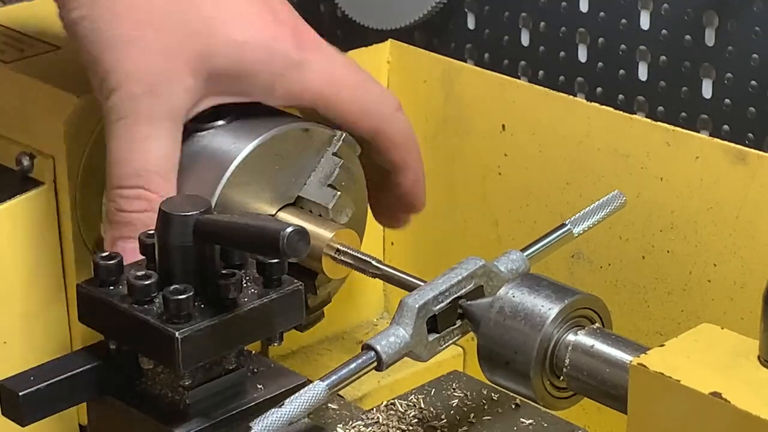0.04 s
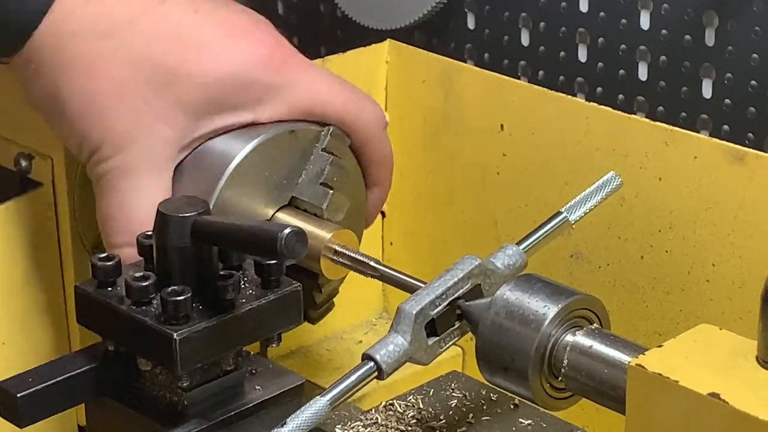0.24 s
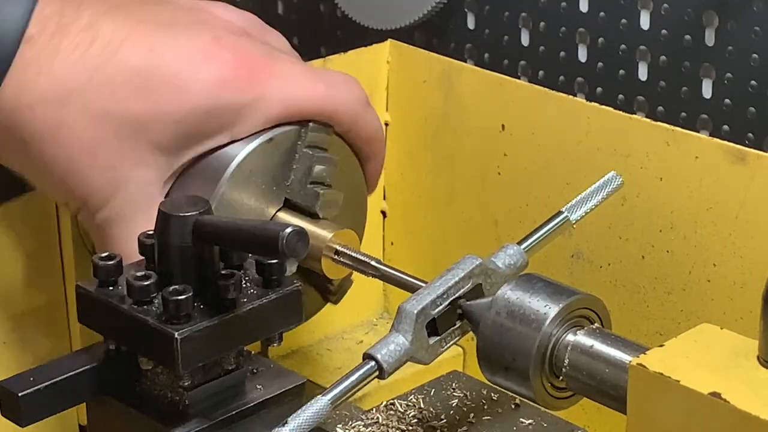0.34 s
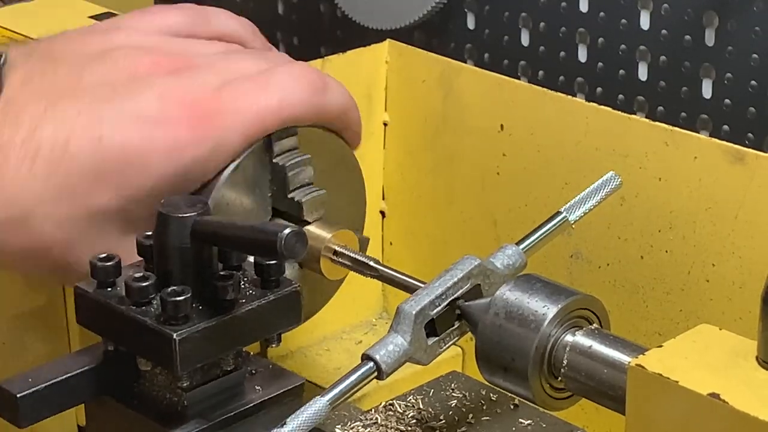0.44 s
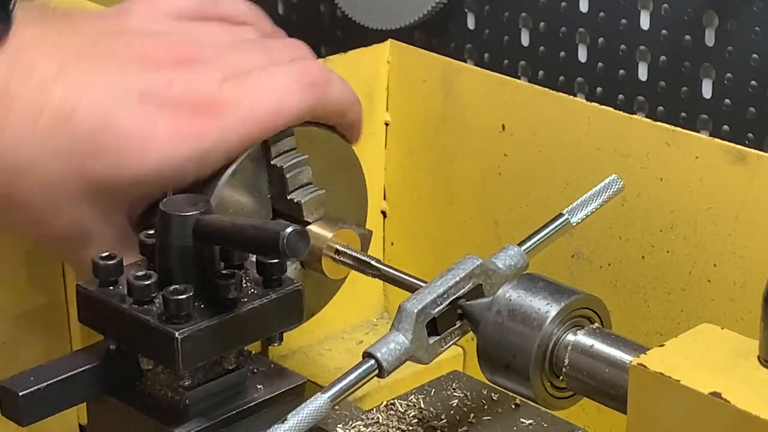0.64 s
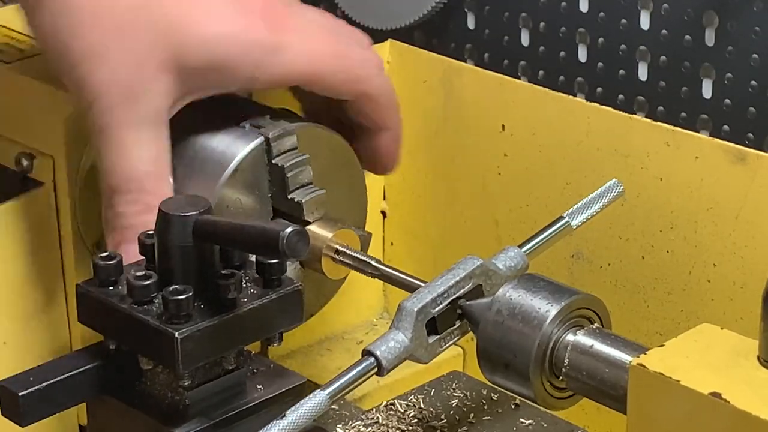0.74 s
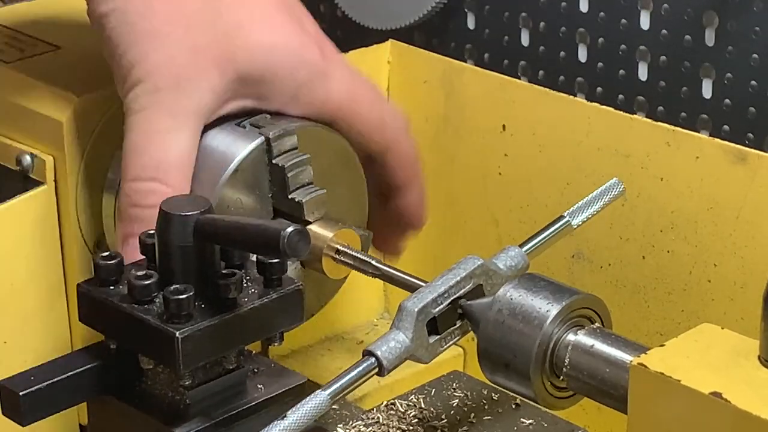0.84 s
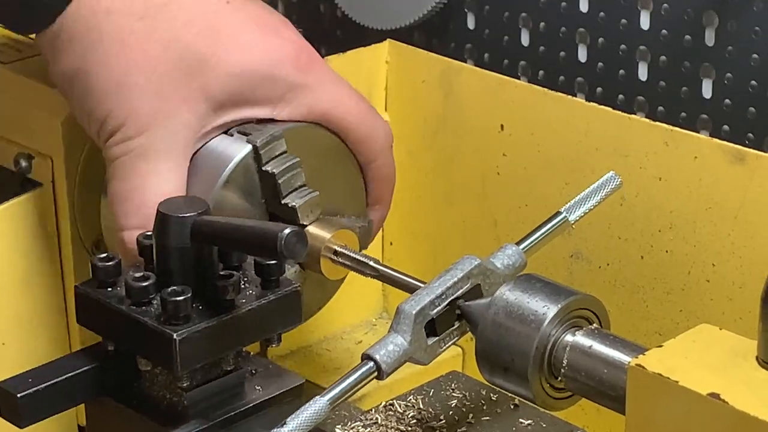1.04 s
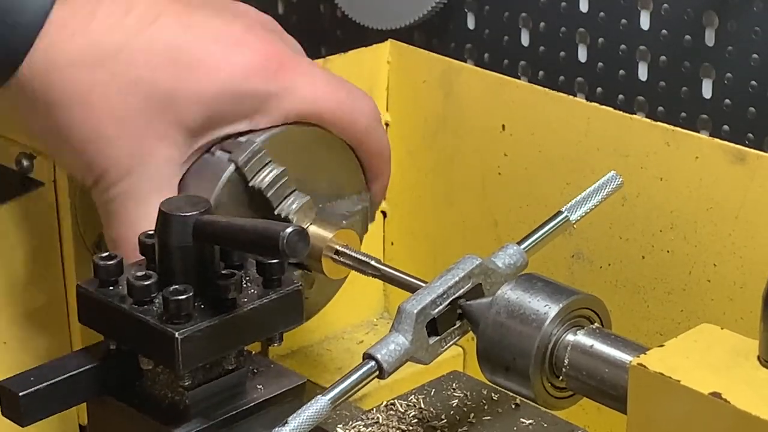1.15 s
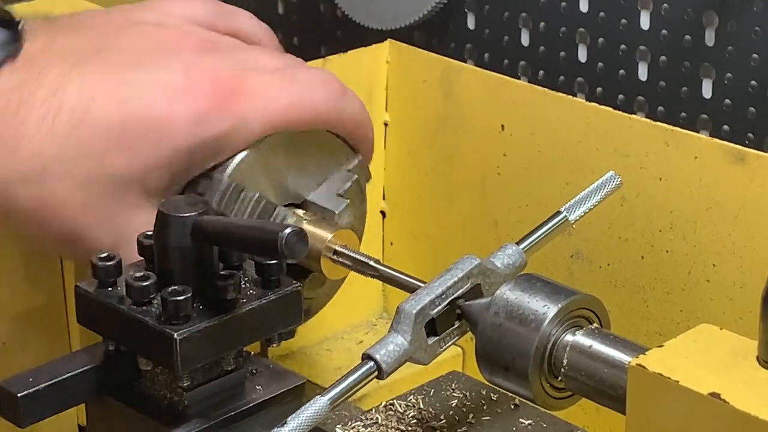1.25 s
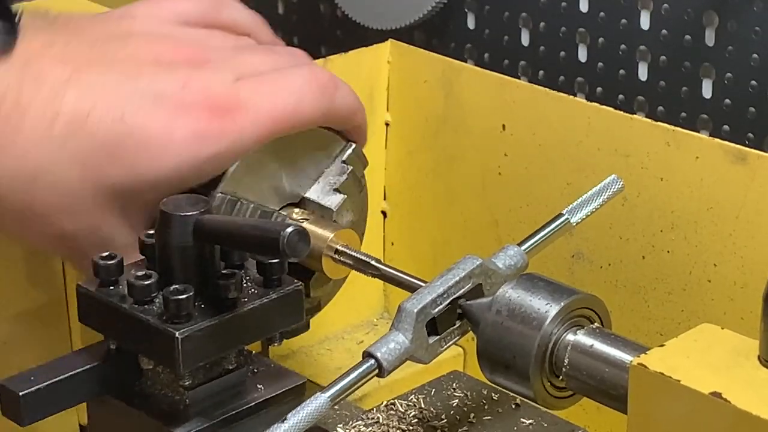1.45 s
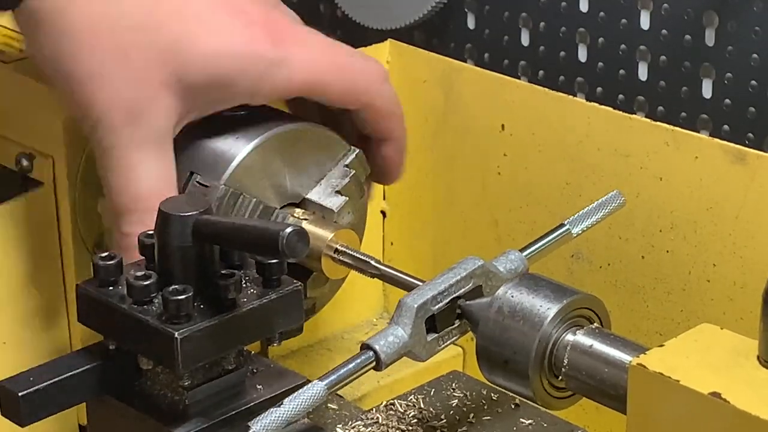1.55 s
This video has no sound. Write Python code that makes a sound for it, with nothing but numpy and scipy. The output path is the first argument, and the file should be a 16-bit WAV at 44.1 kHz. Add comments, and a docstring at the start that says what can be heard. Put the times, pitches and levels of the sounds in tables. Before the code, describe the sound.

Lathe gears, turned by hand, click a few times from about 0.15 seconds, then rattle and whine with a high metallic ring from 0.25 to 0.5. Light clicks follow, and a sharp one at 1 second starts a second whir that rises, holds and drops away by 1.35. A faint rumble surrounds each push. The sound is close, in a small, echoing workshop with a soft hush.

```python
"""In a small, echoing workshop, a hand turns a lathe's chuck in two short pushes to cut a thread.
Each push takes up the slack in the gears with a few clicks, then spins them: the teeth rattle, ring
high and whine at the rate they meet, inside a sheet-metal housing. The spindle rumbles when it rolls
slowly, and the bench shakes faintly. A close stereo microphone hears it all over soft room noise."""
import sys
import numpy as np
from scipy import signal
from scipy.fft import rfft, irfft
from scipy.io import wavfile
from scipy.ndimage import uniform_filter1d

SR = 44100
rng = np.random.default_rng(int(sys.argv[2]) if len(sys.argv) > 2 else 0)


def master_out(mix):
    """Clip the mix to full scale and print it as 16-bit PCM to the path in sys.argv[1]."""
    frames = np.transpose(np.atleast_2d(mix))
    ceiling = np.clip(frames, -1, 1)
    pcm = np.round(ceiling * 32767).astype(np.int16)
    wavfile.write(sys.argv[1], SR, pcm)


N = 70560
TIME = np.arange(N) / SR
FREQS = np.arange(N + 1) * SR / (2 * N) + 1e-6  # Hz, for filtering; never exactly zero
LEFT_RIGHT = np.array([[1], [-1]])

# long-ringing notes of the sheet-metal panels: f/Hz, width/Hz, relative level/dB
PANEL_MODES = [(1030, 11, 7), (2120, 14, -9), (3060, 16, -18)]


def two_pushes():
    """The hand spins the gears twice; the four signals of each push are added up."""
    # how many teeth meet each second: t/s, f/Hz
    first_speed = [(.237, 481.5), (.262, 798.4), (.283, 947.4), (.305, 971.9), (.33, 934.7), (.357, 1031),
                   (.379, 1035), (.394, 924.8), (.412, 906.2), (.432, 821.4), (.45, 1030), (.471, 994.7),
                   (.487, 756.8), (.51, 377.8)]
    second_speed = [(1.009, 340), (1.06, 540), (1.10, 760), (1.125, 935), (1.143, 1020), (1.18, 1036),
                    (1.25, 1033), (1.292, 1014), (1.304, 890), (1.317, 640), (1.332, 380)]
    # strength of the push: t/s, gear taps/dB, housing taps/dB, whine drive/dB
    first_strength = [(0.236, -23.5, -35, -28), (0.276, -29, -31.5, -40.5), (0.285, -20.5, -35.5, -25.5),
                      (.31, -28, -43.5, -20), (0.316, -20.5, -33, -24.5), (.348, -24.5, -38.5, -23),
                      (0.372, -17.5, -40.5, -22.5), (0.399, -27.5, -52.5, -20.5), (0.433, -27, -32, -26),
                      (.462, -26, -36, -23.5), (.508, -30.5, -34.5, -26.5)]
    second_strength = [(1.011, -31, -39.5, -34), (1.029, -29.5, -34.5, -45.5), (1.11, -26.5, -32.5, -26.5),
                       (1.149, -21, -41, -23.5), (1.19, -22.5, -35.5, -26), (1.205, -23, -68.5, -21.5),
                       (1.24, -23.5, -45, -21), (1.265, -21, -56, -23.5), (1.292, -24, -34.5, -33.5),
                       (1.331, -34, -36, -27.5)]
    return push(first_speed, first_strength) + push(second_speed, second_strength)


def push(speed, strength):
    """One push gives taps on the gears, taps on the housing, a whine and taps for a low growl."""
    full_speed_hz, wobble = 1038, .005
    speed, strength = np.array(speed), np.array(strength)
    tooth_hz = np.interp(TIME, *speed.T) * (1 + wobble * wander(90))
    tooth_count = np.cumsum(tooth_hz) / SR
    pace = tooth_hz / full_speed_hz
    gear_gain, housing_gain, drive = (undb(np.interp(TIME, strength[:, 0], db)) for db in strength.T[1:])
    whine = drive * gear_whine(tooth_count, tooth_hz) * pace ** 2.9  # grows with speed
    growl_taps = undb(-41 - 15.5 * pace ** 6) * tooth_taps(tooth_count, tooth_hz)  # fades with speed
    gear_taps = gear_gain * tooth_taps(tooth_count, tooth_hz)
    housing_taps = housing_gain * tooth_taps(tooth_count, tooth_hz)
    return gate(speed[0, 0], speed[-1, 0]) * np.array([gear_taps, housing_taps, whine, growl_taps])


def tooth_taps(tooth_count, tooth_hz):
    """Each tooth lands with one uneven tap and a short scrape after it."""
    jitter_teeth, scatter_db, scrape_s = .13, 2.5, .0001
    uneven_count = np.maximum.accumulate(tooth_count + jitter_teeth * wander(900))
    taps = np.diff(np.floor(uneven_count), prepend=0)
    taps *= undb(scatter_db * rng.standard_normal(N).clip(-2, 2)) / np.sqrt(tooth_hz)
    tails = signal.lfilter([1], [1, -np.exp(-1 / (scrape_s * SR))], taps)
    scrape = tails * rng.standard_normal(N)
    return unit(unit(taps - taps.mean()) + undb(-12.5) * unit(scrape))


def gear_whine(tooth_count, tooth_hz):
    """Meeting teeth make a tone whose overtones swell as they pass a resonance."""
    # resonances that pick out the overtones: f/Hz, width/Hz, gain/dB
    modes = [(1110, 59.6, -1.5), (1854, 57.3, 2), (3360, 460, -13.5), (3970, 240, -19), (5230, 360, -9.5),
             (7560, 380, -14), (10020, 370, -15), (10660, 200, -1.5), (11370, 110, -17)]
    phase = tooth_count + .022 * wander(350)  # each tooth meets a little early or late
    whine, flutter_db = 0, 2.5
    for k in range(1, 12):
        gain = np.sqrt(sum(abs(response([mode], k * tooth_hz)) ** 2 for mode in modes))
        whine += gain * undb(flutter_db * wander(71)) * np.sin(2 * np.pi * k * phase)
    return whine


def gear_ring(taps, rubbing):
    """Tooth taps and a little rubbing make the steel gears ring high."""
    # notes of the gears: f/Hz, width/Hz, relative level/dB
    modes = [(8070, 67, -7.5), (9180, 47, -0.5), (9830, 200, -4.5), (10160, 48, 1), (10360, 70, 5.5),
             (10950, 30, -6.5), (10920, 69, -2.5), (11080, 780, -13), (11340, 94, -3.5),
             (11600, 240, -12.5), (12400, 1000, -9.5), (12800, 100, -1), (13470, 190, -2.5),
             (14600, 660, -11), (15550, 270, -8.5)]
    return ring(taps + undb(-14) * rubbing, modes, low_hz=6500)


def housing_rattle(taps, click_force):
    """Tooth taps rattle the housing; taps and clicks leave its panels ringing."""
    # notes of the housing: f/Hz, width/Hz, relative level/dB
    modes = [(806, 40, -6.5), (1054, 157, 2), (1940, 504, -2.5), (2060, 38, -3), (2176, 200, -2),
             (2745, 250, 0), (3140, 180, 4), (3350, 340, -2), (3947, 220, -7), (5123, 530, -9),
             (6390, 210, 0.5), (7264, 120, -3.5)]
    panels = undb(-14) * ring(taps + click_force, PANEL_MODES, low_hz=700)
    return ring(taps, modes, low_hz=243.6) + panels


def gear_growl(taps):
    """The teeth of slowly turning gears stir up low notes."""
    # notes of the growl: f/Hz, width/Hz, relative level/dB
    modes = [(340, 55, 3), (464, 93, -4), (570, 45, -3), (795, 90, 2.5)]
    return ring(taps, modes, low_hz=248)


def slack_clicks():
    """Teeth hit as the slack closes: bright snaps, clacks with dull knocks, a force on the housing."""
    # the clicks: t/s, knock f/Hz, knock level/dB, clack level/dB, snap level/dB, burst decay/s
    clicks = [(0.141, 587, -34, -41, -51.5, 0.0081), (.174, 882, -37, -33, -27, 0.0048),
              (0.2348, 1874, -34, -31.5, -18.5, 0.0018), (.601, 1050, -63.5, -62, -36.5, .002),
              (0.781, 1022, -50.5, -49.5, -87, 0.0015), (0.852, 1108, -46.5, -35, -64, 0.0027),
              (0.908, 841, -37, -44.5, -40, 0.011), (1.008, 910, -60, -30, -17.5, 0.0017),
              (1.3255, 565, -35, -50, -39, 0.00033)]
    # brief high and lower notes of teeth pressed together: f/Hz, width/Hz, relative level/dB
    snap_modes = [(9580, 300, 2.5), (12000, 1900, -8.5), (15500, 550, -1.5)]
    clack_modes = [(1060, 300, -12.5), (1960, 380, -2), (3260, 100, -1), (4300, 670, -18),
                   (6500, 1500, -17)]
    knock_drift_hz, knock_rise_s, knock_decay_s, clack_top_hz = 49, .002, .013, 9000
    gear_force, housing_force, knocks = np.zeros((3, N))
    for start, hz, knock_db, clack_db, snap_db, decay_s in clicks:
        started, age = TIME >= start, np.maximum(TIME - start, 0)
        burst = started * np.exp(-age / decay_s) * rng.choice([-1, 1], N)
        gear_force += undb(snap_db) * burst
        housing_force += undb(clack_db) * burst
        cycles = np.cumsum(started * (hz + knock_drift_hz * wander(300))) / SR
        envelope = np.exp(-age / knock_decay_s) * (1 - np.exp(-age / knock_rise_s))
        knocks += undb(knock_db) * envelope * np.sin(2 * np.pi * cycles)
    treble_cut = 1 / (1 + 1j * FREQS / clack_top_hz - (FREQS / clack_top_hz) ** 2)
    housing_force = filtered(housing_force, treble_cut)
    snaps = ring(gear_force, snap_modes, low_hz=7200)
    clacks = ring(housing_force, clack_modes, low_hz=500)
    return snaps, clacks + knocks, housing_force


def spindle_roll():
    """The slowly rolling spindle rubs unevenly; gives the rubbing and the rumble it makes."""
    # slow stretches: start/s, end/s, level/dB
    rolls = [(0.158, 0.253, -45), (0.51, 0.574, -53), (0.891, 1.022, -57), (1.034, 1.124, -45),
             (1.32, 1.452, -54.5)]
    # notes of the rumble: f/Hz, width/Hz, relative level/dB
    modes = [(374, 91, 30.5), (571, 110, -9), (842, 130, -4.5), (1886, 3600, -15.5)]
    envelope = sum(gate(start, end) * undb(db) for start, end, db in rolls)
    rubbing = envelope * rng.standard_normal(N) * undb(wander(180))
    return rubbing, ring(rubbing, modes, low_hz=207)


def bench_shake(rubbing):
    """The spindle's rubbing faintly shakes the bench."""
    # deep notes of the bench: f/Hz, width/Hz, relative level/dB
    modes = [(62, 29.7, 3.5), (112, 40, 3), (190, 38, 5)]
    return undb(-16) * ring(rubbing, modes, low_hz=35)


def workshop(x, guard_db, room_db):
    """Sound reaches the microphone directly, off the lathe's splash guard and as the room's echo."""
    # how far the left channel leads the right: f/Hz, phase/rad
    left_lead = [(0, 0), (4350, -.4), (5400, -3.1), (6300, -6.3), (8450, -9.4), (11100, -12.6),
                 (13500, -15.7), (15450, -18.8), (22050, -27)]
    # time the echo takes to fade by 60 dB: f/Hz, t/s
    echo_times = [(200, 0.31), (550, 0.73), (1400, 0.57), (3700, 0.52), (10000, 0.34), (14000, 0.25)]
    guard_decay_s = .0047
    guard = unit(rng.standard_normal((2, N)) * np.exp(-TIME / guard_decay_s) * (TIME > .001))
    band_hz, fade_times = np.array(echo_times).T
    noise, echo = rng.standard_normal((2, N)), 0
    for share, fade_s in zip(np.eye(len(band_hz)), fade_times):
        band = filtered(noise, np.interp(np.log(FREQS), np.log(band_hz), share))
        echo += band * undb(-60 * TIME / fade_s)
    reflections = (undb(guard_db) * guard + undb(room_db) * unit(echo * (TIME > .006))) / np.sqrt(N)
    mid, side = rfft(reflections, 2 * N)
    spread = FREQS / np.hypot(FREQS, 600)  # low notes are alike on both sides
    reflected = (mid + LEFT_RIGHT * spread * side) / np.sqrt(2)
    direct = np.exp(LEFT_RIGHT * 1j * np.interp(FREQS, *np.array(left_lead).T) / 2)
    power = 1 + undb(guard_db) ** 2 + undb(room_db) ** 2
    return filtered(x, (direct + reflected) / np.sqrt(power))


def room_air():
    """The room has a faint, steady hush."""
    # tone of the hush: f/Hz, relative level/dB
    spectrum = [(20, -19.5), (45, -1), (75, 0.5), (160, -8), (350, -3.5), (600, -11), (1000, -13),
                (2500, -17.5), (5000, -30), (10000, -36), (16000, -43)]
    hz, db = np.array(spectrum).T
    gain = undb(np.interp(np.log(FREQS), np.log(hz), db))
    mid, side = unit(filtered(rng.standard_normal((2, N)), gain))
    return undb(-66) * (mid + undb(-7) * side * LEFT_RIGHT)


def undb(db):
    """Turn decibels into a gain."""
    return 10 ** (np.asarray(db) / 20)


def unit(x):
    """Scale to an average power of 1."""
    return x / np.sqrt(np.mean(x ** 2))


def filtered(x, gain):
    """Apply one gain for each frequency in FREQS."""
    return irfft(rfft(x, 2 * N) * gain)[..., :N]


def response(modes, hz):
    """How modes (an object's own notes) respond at hz, added with alternating signs."""
    return sum((-1) ** k * undb(db) / (1 + 1j * (hz / centre - centre / hz) * centre / width)
               for k, (centre, width, db) in enumerate(modes))


def ring(x, modes, low_hz):
    """Let x ring the modes, with a cut below low_hz and an average power gain of 1."""
    gain = response(modes, FREQS) / (1 + low_hz / (1j * FREQS) - (low_hz / FREQS) ** 2) ** 2
    return filtered(x, gain / np.sqrt(np.mean(abs(gain) ** 2)))


def wander(rate_hz):
    """A smooth random wiggle of about size 1."""
    window = int(SR / rate_hz)
    return unit(uniform_filter1d(uniform_filter1d(rng.standard_normal(N), window), window))


def gate(start, end, release_s=.001):
    """On from start to end, then a quick fade."""
    return (TIME >= start) * np.exp(-np.maximum(TIME - end, 0) / release_s)


def scene():
    """The gears ring and whine straight at the microphone; the housing and its panels fill the room."""
    gear_taps, housing_taps, whine, growl_taps = two_pushes()
    snaps, clacks, click_force = slack_clicks()
    rubbing, rumble = spindle_roll()
    treble = gear_ring(gear_taps, rubbing) + snaps
    body = housing_rattle(housing_taps, click_force) + clacks + gear_growl(growl_taps) + rumble
    whine = filtered(whine, 1 + undb(-3.5) * response(PANEL_MODES, FREQS))  # the panels ring along
    return (workshop(treble, guard_db=-20.5, room_db=-16)
            + workshop(body, guard_db=4, room_db=-2.5)
            + workshop(whine, guard_db=-13, room_db=-9)
            + bench_shake(rubbing) + room_air())


def record(dry):
    """The recorder cuts off the highest treble."""
    top_hz = 15850
    return signal.sosfilt(signal.ellip(10, .2, 70, top_hz, fs=SR, output="sos"), dry)


dry = scene()
out = record(dry)
master_out(out)
```